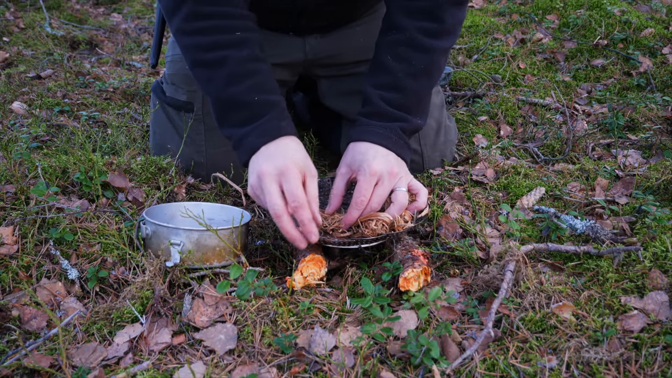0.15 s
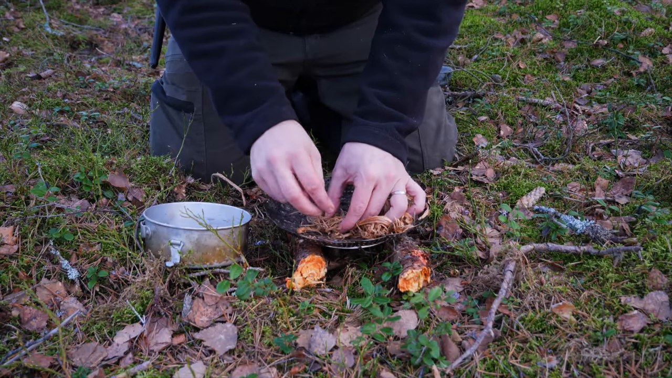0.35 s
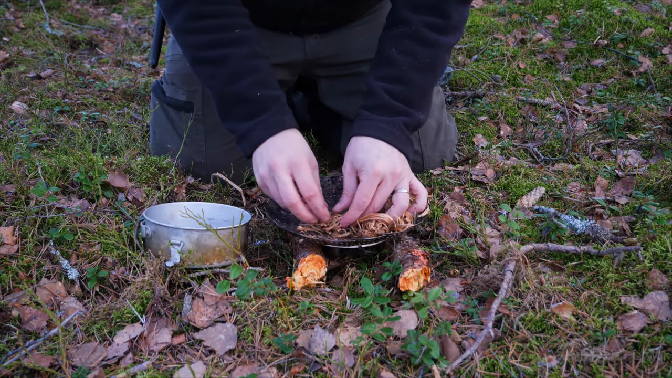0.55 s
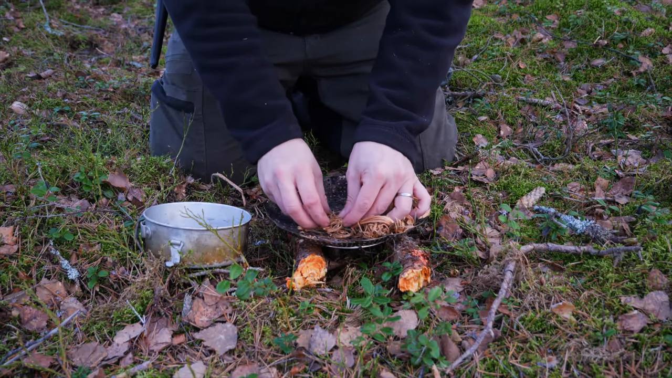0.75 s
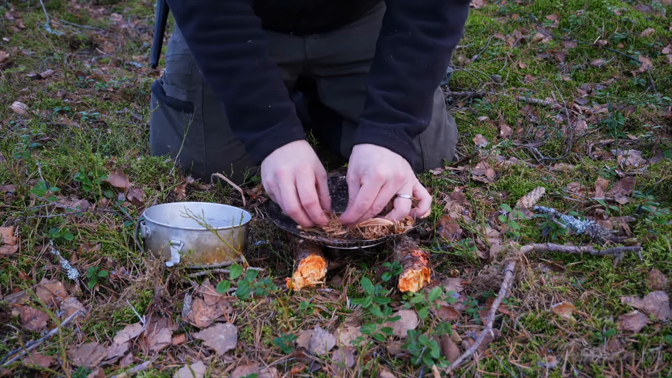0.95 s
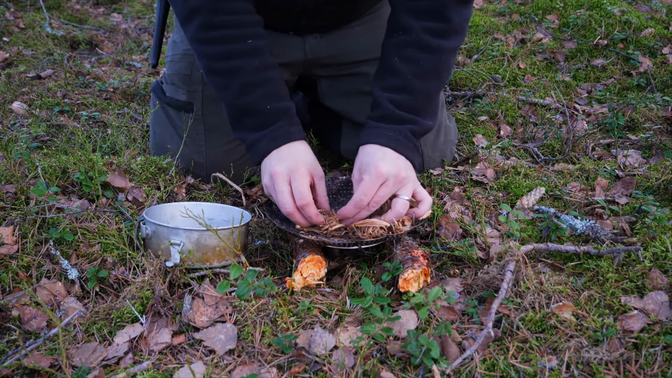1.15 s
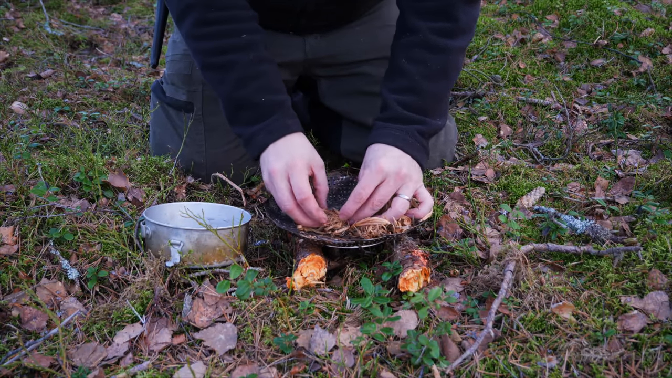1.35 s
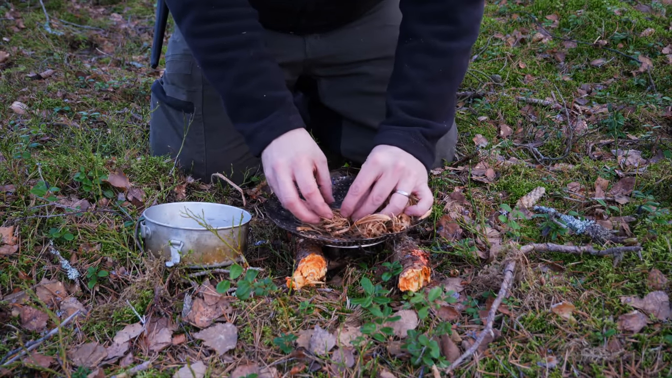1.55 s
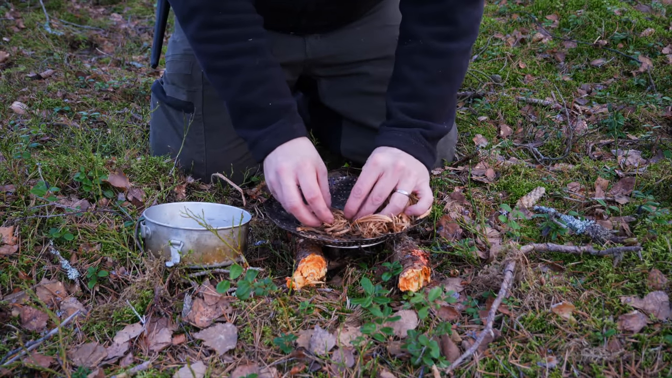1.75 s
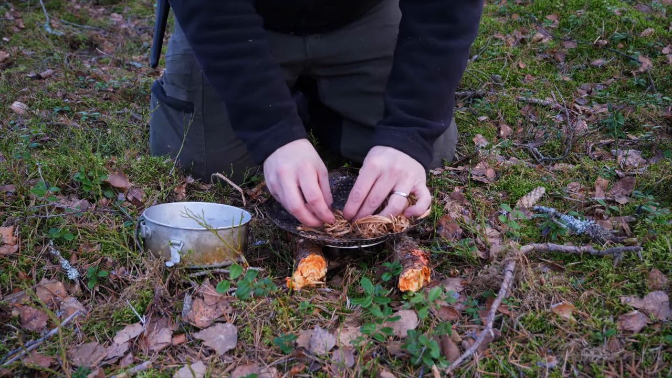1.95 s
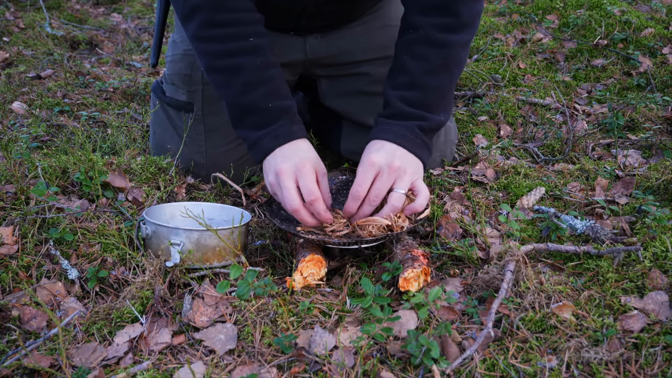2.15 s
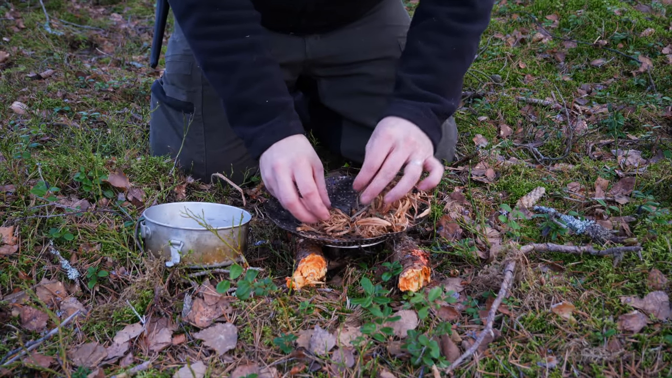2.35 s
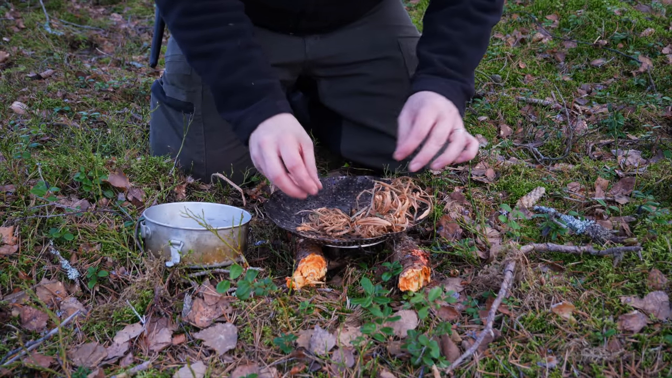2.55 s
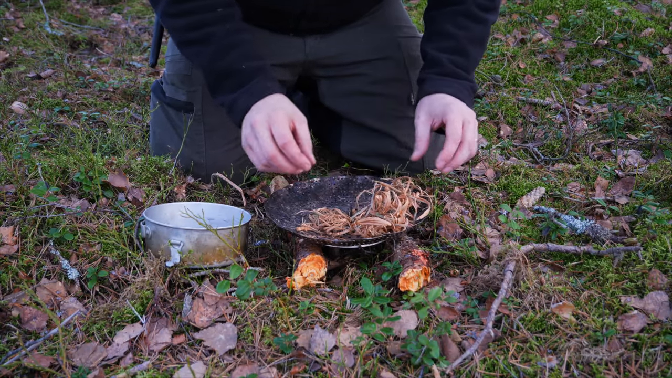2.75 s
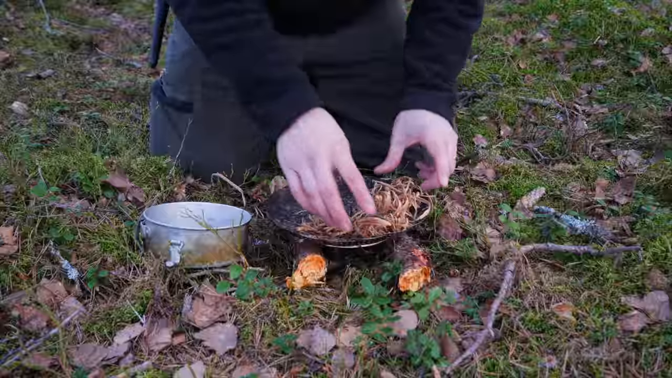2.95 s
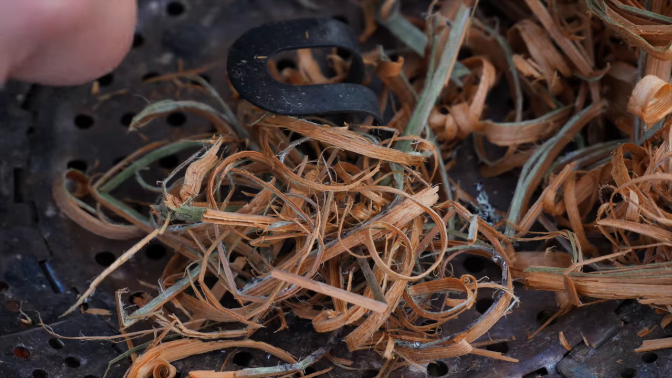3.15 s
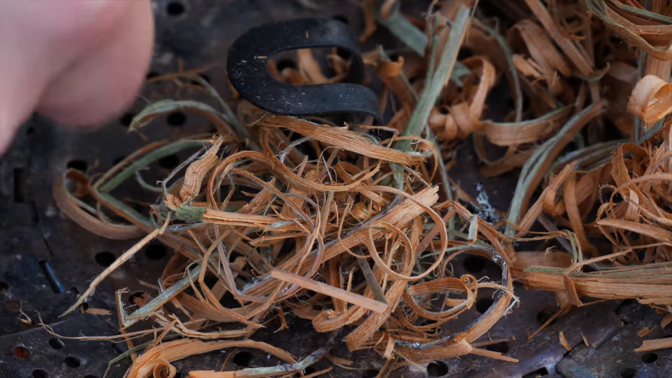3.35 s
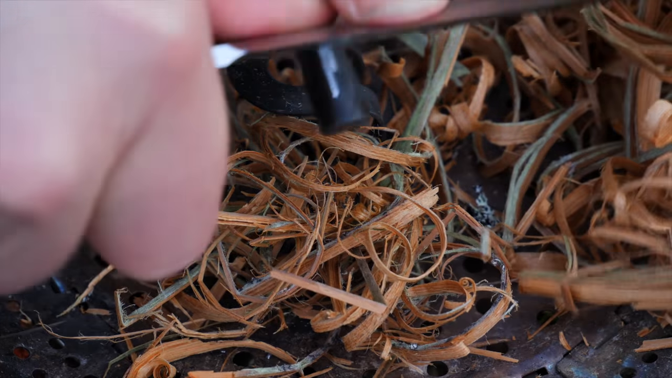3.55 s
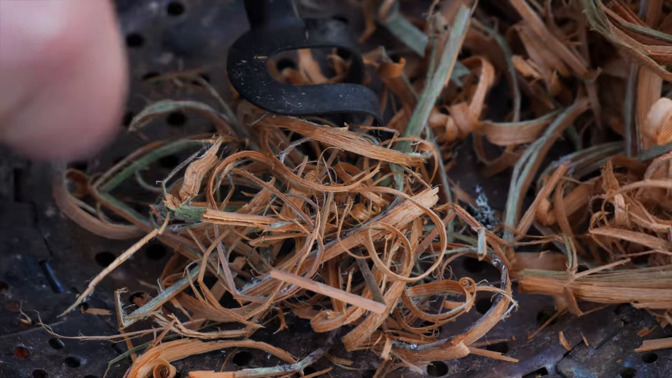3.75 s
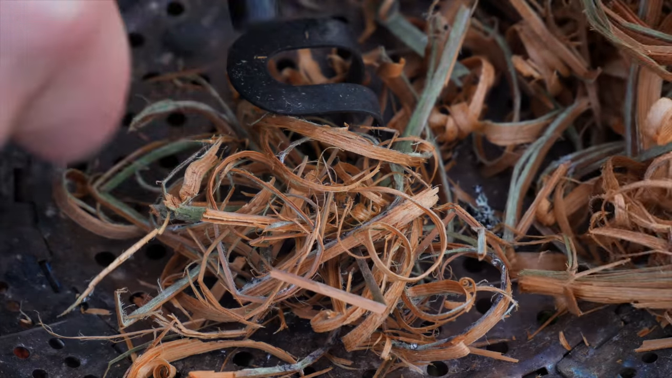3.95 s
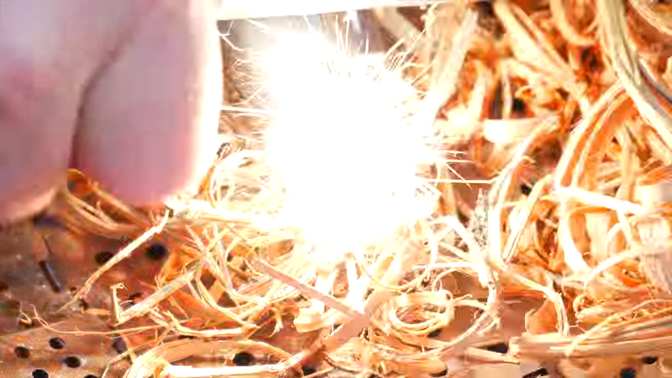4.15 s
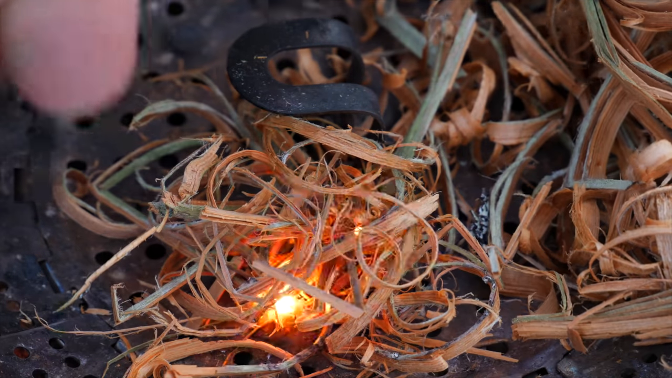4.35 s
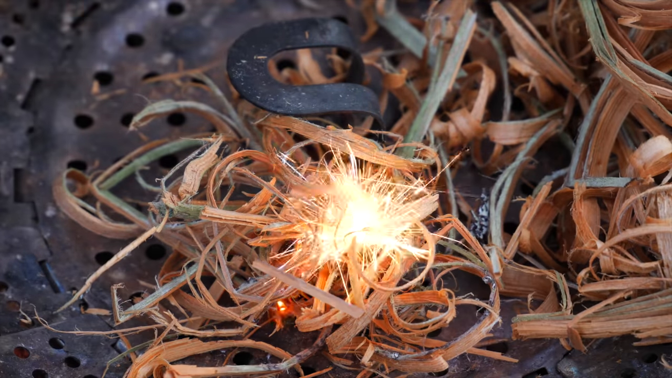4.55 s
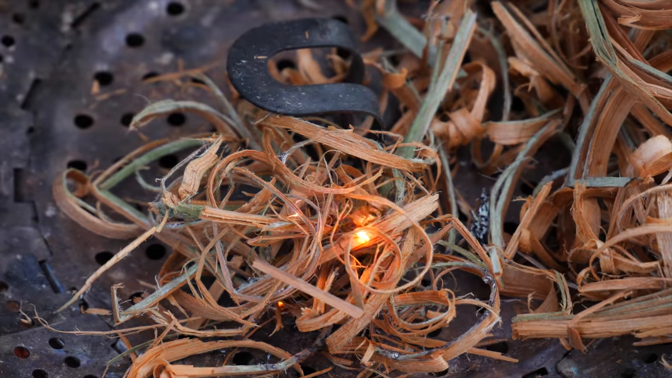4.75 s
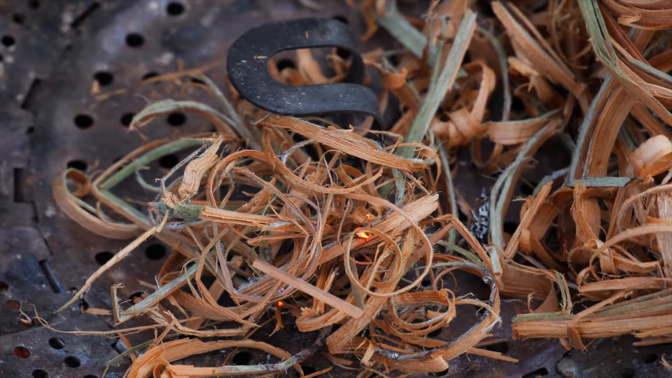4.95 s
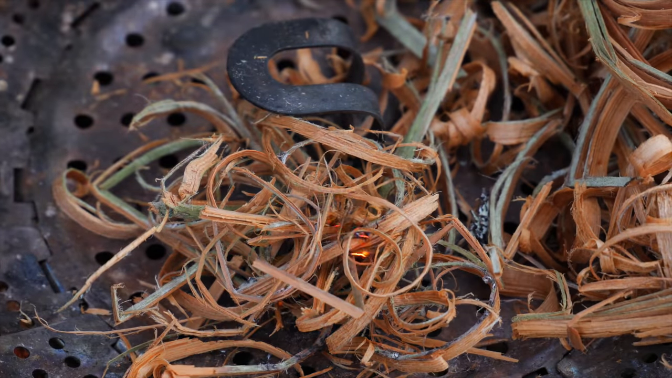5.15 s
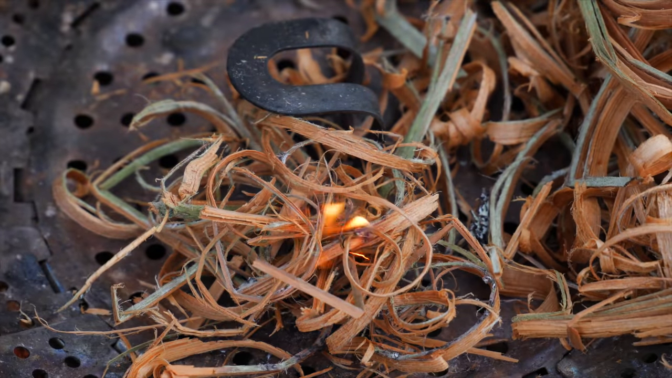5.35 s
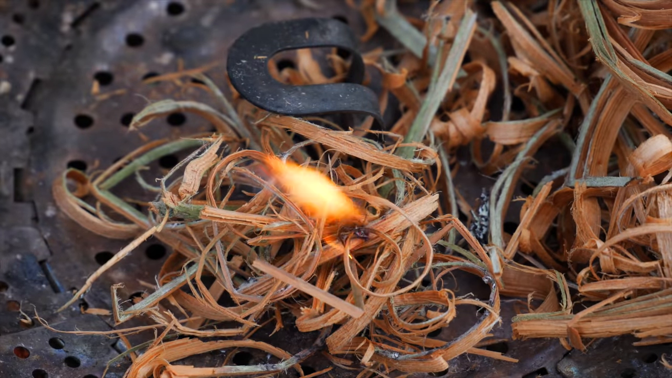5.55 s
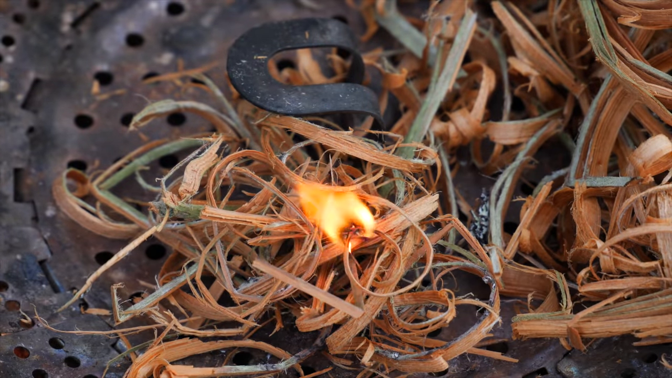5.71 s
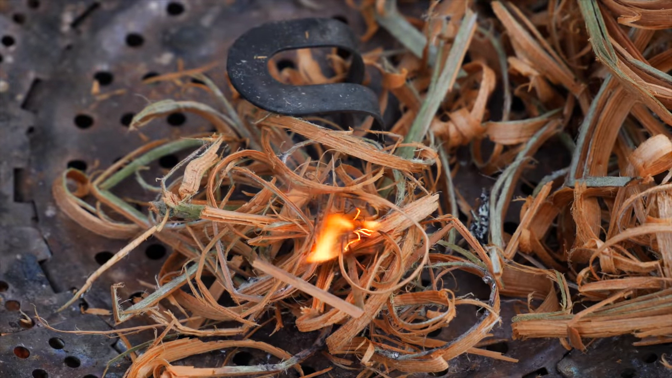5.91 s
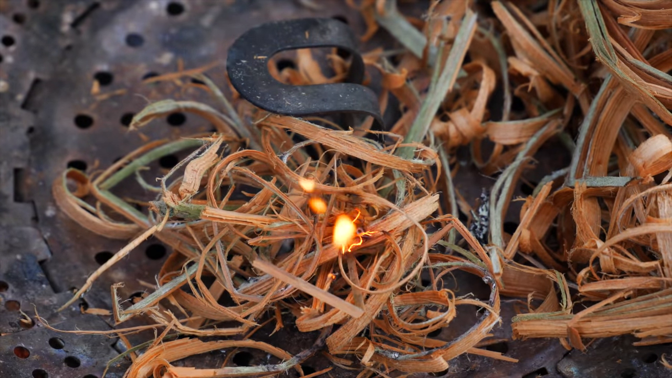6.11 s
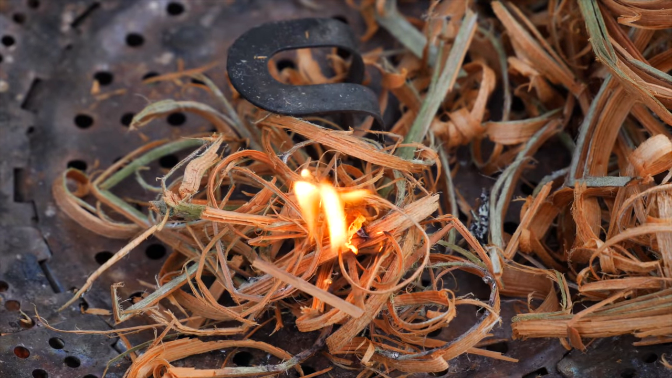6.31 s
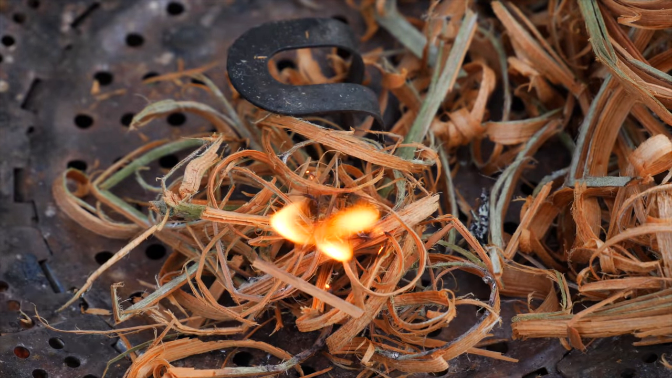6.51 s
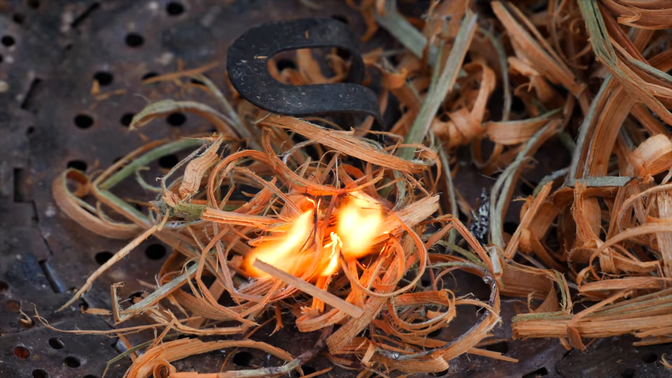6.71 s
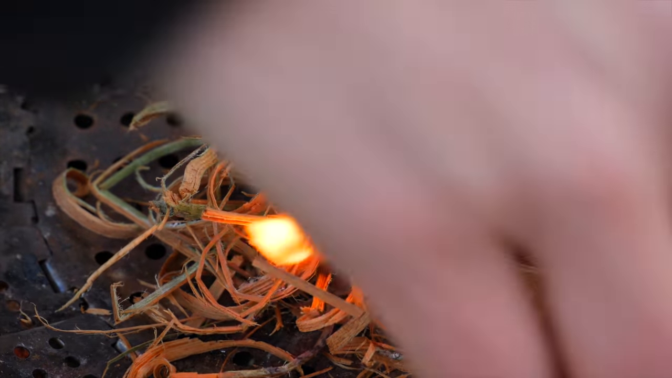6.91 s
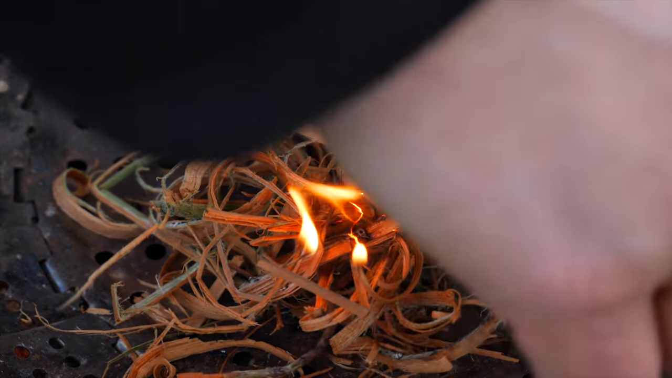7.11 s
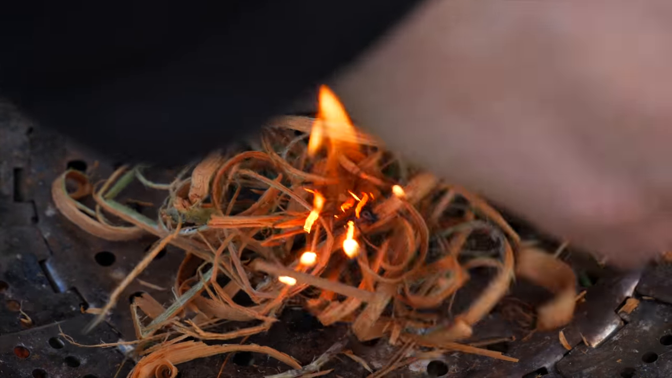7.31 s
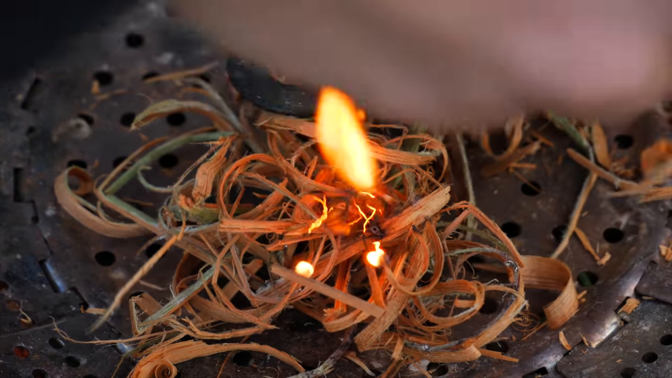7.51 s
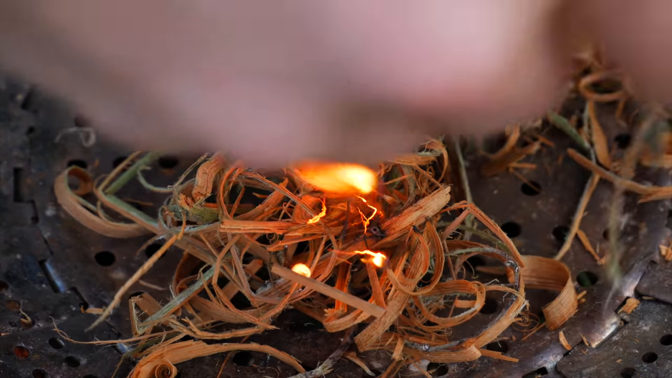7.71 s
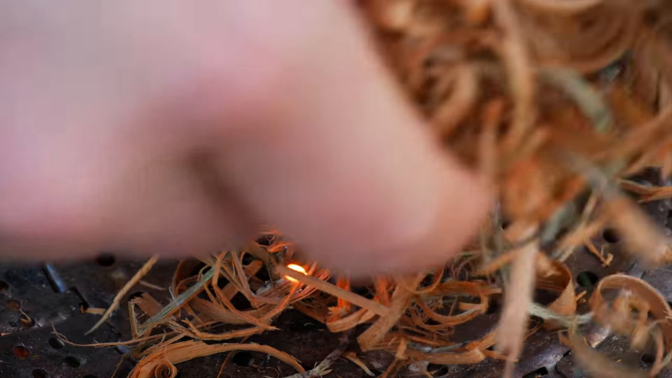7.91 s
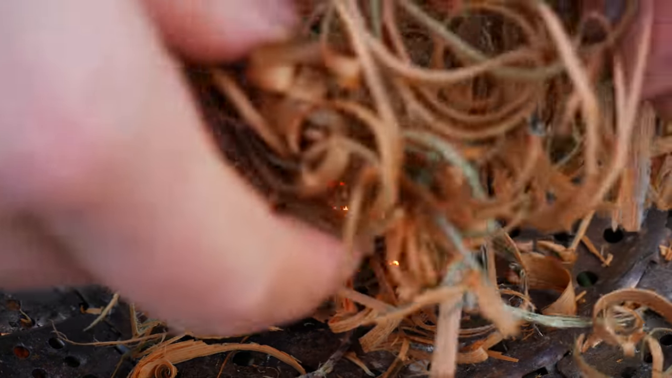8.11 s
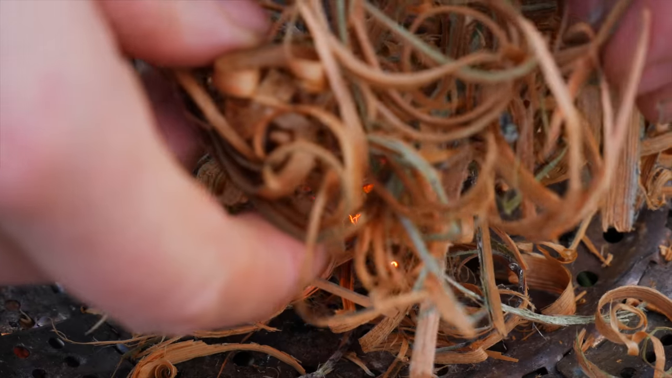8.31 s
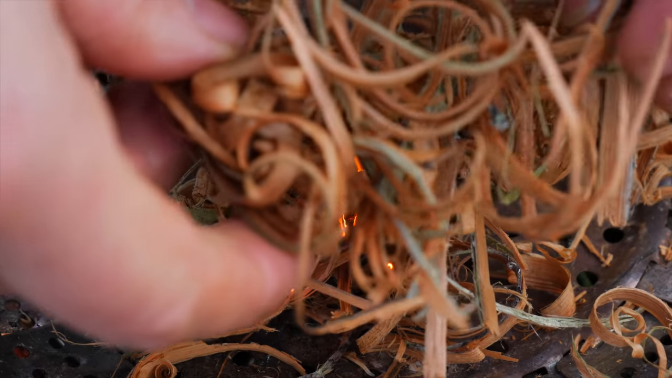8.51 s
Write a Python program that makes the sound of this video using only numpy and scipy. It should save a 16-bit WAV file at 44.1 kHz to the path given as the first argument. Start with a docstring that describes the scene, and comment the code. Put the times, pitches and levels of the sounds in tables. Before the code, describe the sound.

Soft handling of wood shavings, then chattering fire steel scrapes, a sizzling burst of sparks, light metal clinks and crackling tinder in a quiet forest.

```python
"""A scraper chatters along a fire steel in stick-slip runs, then bites in one long, spark-throwing stroke.
Before it, hands gather dry wood shavings on a small steel stove grate; the curls rub, skid and snap.
After it, sparks pop and sizzle in the tinder, the tools clink as they are laid down, and the shavings
crackle as they catch and are heaped over the flame. Close mono microphone, quiet forest, light breeze."""
import sys
import numpy as np
from scipy.fft import rfft, irfft, next_fast_len
from scipy.io import wavfile
from scipy.ndimage import map_coordinates

SR = 44100
rng = np.random.default_rng(int(sys.argv[2]) if len(sys.argv) > 2 else 0)


def inscribe(sig):
    """Save sig as 16-bit PCM at rate SR to the path in sys.argv[1].

    A 1-D sig is mono; a 2-D sig holds one channel per row.
    Samples are clipped to [-1, 1] before scaling.
    """
    pcm = np.round(np.clip(np.atleast_2d(sig).T, -1, 1) * 32767)
    wavfile.write(sys.argv[1], SR, pcm.astype(np.int16))


N = 377927


def amp(db):
    return 10 ** (np.asarray(db) / 20)


def unit(x):
    return x / np.sqrt(np.mean(x ** 2) + 1e-20)


def decay(t, t60_s):
    return np.exp(-np.log(1000) * t / t60_s)


def add(track, start_s, sound):
    part = track[round(start_s * SR):][:len(sound)]
    part += sound[:len(part)]


def colour(x, spectrum):
    """Minimum-phase filter through (frequency [Hz], gain [dB]) points."""
    size = next_fast_len(len(x) + 2048, real=True)
    hz, db = np.transpose(spectrum)
    gain = amp(np.interp(np.log(np.fft.rfftfreq(size, 1 / SR) + 1), np.log(hz + 1), db))
    cepstrum = irfft(np.log(np.maximum(gain, 1e-6)), size)
    cepstrum[1:size // 2] *= 2
    cepstrum[size // 2 + 1:] = 0
    return irfft(rfft(x, size) * np.exp(rfft(cepstrum)), size)[:len(x)]


def resonate(x, modes):
    """Parallel band-pass resonances of alternating sign."""
    size = next_fast_len(len(x) + 8192, real=True)
    f = np.fft.rfftfreq(size, 1 / SR)
    body = sum((-1) ** k * amp(db) * 1j * f * width_hz / (hz * hz - f * f + 1j * f * width_hz)
               for k, (hz, width_hz, db) in enumerate(modes))
    return irfft(rfft(x, size) * body, size)[:len(x)]


def noise(spectrum):
    return unit(colour(rng.standard_normal(N), spectrum))


def burst(envelope, spectrum):
    """Coloured noise under a short envelope, at the envelope's rms."""
    x = colour(rng.standard_normal(len(envelope)) * envelope, spectrum)
    return unit(x) * np.sqrt(np.mean(envelope ** 2))


def wobble(rate_hz):
    """Smooth random curve."""
    knots = rng.standard_normal(int(N * rate_hz / SR) + 4)
    return map_coordinates(knots, [np.arange(N) * rate_hz / SR])


def grains(per_s, spread_db, clump_db, clump_hz, friction):
    """Tiny uneven fractures in clumps, over smooth friction noise; rms 1."""
    sizes = amp(spread_db * np.minimum(rng.exponential(size=N), 4))
    ticks = (rng.random(N) < per_s / SR) * sizes * rng.choice([-1, 1], N)
    texture = unit(ticks) + friction * rng.standard_normal(N)
    clumps = amp(clump_db * 2.79 * np.tanh(wobble(clump_hz) / 2))
    return unit(texture * clumps)


def swells(rows):
    """Gain curve of short swells: (time [s], level [dB], length [s])."""
    out, t = np.zeros(N), np.arange(SR // 4) / SR
    for start_s, db, length_s in rows:
        u = 3.5 * t / length_s
        add(out, start_s, amp(db) * u ** 2 * np.exp(2 * (1 - u)))
    return out


def held(start_s, length_s, db, growth_db, attack_s, release_db_per_s):
    """Gain curve: attack, sloping hold centred on db, release."""
    t = np.arange(N) / SR - start_s
    hold_db = db + growth_db * (np.clip(t / length_s, 0, 1) - .5)
    fall_db = release_db_per_s * np.maximum(t - length_s, 0)
    return np.clip(t / attack_s, 0, 1) * amp(hold_db - fall_db)


# breeze strength: (time [s], level [dB])
BREEZE = [(0, -64.5), (3.03, -54.5), (3.17, -42.5), (3.65, -33.5), (4.1, -40), (4.35, -30), (4.9, -33.5),
          (5.15, -43), (5.8, -40.5), (6.8, -37), (7.25, -36.5), (7.9, -48.5), (8.57, -47.5)]
# background spectra: (frequency [Hz], gain [dB])
RUMBLE_SPECTRUM = [(11, -27), (18, 13), (43, -7.5), (76, -6), (108, -12.5), (220, -24.5), (290, -63.5),
                   (480, -120)]
FOREST_SPECTRUM = [(53, -29), (90, -7.5), (251, -10.5), (283, -13), (445, -14), (486, -13.5), (597, -14.5),
                   (2670, -30), (3000, -33.5), (3900, -55.5), (6600, -120)]
DRONE_SPECTRUM = [(35, -30.5), (75, 3.5), (100, 3.5), (135, -2), (200, -11), (500, -31.5), (2000, -67)]
HISS_SPECTRUM = [(900, -30.5), (1600, -16.5), (3400, -10.5), (8000, -12), (13500, -14), (15500, -18),
                 (16200, -34.5)]


def air(close_s=3.06, drone_fade_db_per_s=3.5):
    """A gusty breeze rumbles under forest murmur, a fading far drone and steady hiss."""
    t = np.arange(N) / SR
    gusts_db = np.interp(t, *np.transpose(BREEZE)) + 1.3 * wobble(4.5)
    rumble = amp(gusts_db - 7) * noise(RUMBLE_SPECTRUM)
    murmur_db = np.where(t < close_s, -65.5, -61)  # steps up once the microphone is close
    murmur = amp(murmur_db) * noise(FOREST_SPECTRUM)
    drone = amp(-58.5 - drone_fade_db_per_s * t) * noise(DRONE_SPECTRUM)
    return rumble + murmur + drone + amp(-72.5) * noise(HISS_SPECTRUM)


# hand effort on the tinder: (time [s], level [dB])
GATHERING = [(0, -71), (.56, -64), (1.05, -58), (1.55, -59.5), (1.99, -64), (2.45, -65), (2.7, -78.5)]
BRACING = [(3.1, -62), (3.5, -63), (3.93, -69), (4.2, -55), (4.5, -60), (4.7, -66)]
HEAPING = [(4.9, -78), (5.78, -72.5), (6.14, -50), (6.27, -46), (6.43, -45), (6.58, -49), (6.77, -43.5),
           (6.87, -59.5), (7.2, -51), (7.42, -57), (7.9, -59), (8.25, -65.5), (8.57, -66.5)]
# short crackles, shavings crushed or tinder faintly sizzling: (time [s], level [dB], length [s])
CRACKLES = [(1.82, -57.5, 0.1), (3.064, -48.5, 0.029), (5.1, -66.5, 0.15), (5.4, -69, 0.21),
            (5.9, -52, 0.084), (6.21, -33, 0.052), (6.435, -39, 0.043), (6.625, -38.5, 0.028),
            (6.67, -44, 0.061), (6.705, -36, 0.057), (6.735, -23, 0.038)]
# rubbed, pressed and crackling shavings: (frequency [Hz], gain [dB])
CURL_SPECTRUM = [(1760, -54), (3000, -13), (3170, -10.5), (5290, -6.5), (6130, -11), (6810, -5),
                 (7940, -0.5), (9660, -13), (10700, -12.5), (11800, -6.5), (14200, -12), (15100, -9.5),
                 (16000, -36)]
HEAP_SPECTRUM = [(120, -28.5), (300, -2), (480, 5.5), (900, 2), (1380, 4), (1700, 3), (2100, 2),
                 (2600, -1.5), (4500, -6), (6000, -14), (10000, -46.5)]
CRACKLE_SPECTRUM = [(150, -5.5), (700, -9), (2300, 2), (3500, -4), (5500, -2.5), (7500, 4.5), (9500, -13),
                    (13000, -12.5), (16000, -17)]


def shavings(tick_count=300, reference_db=-60):
    """Wood curls rub, tick and crackle; pressing brings out the body of the heap."""
    effort, pressing = np.zeros(N), np.zeros(N)
    phases = [(GATHERING, -65, .45), (BRACING, -57.5, .5), (HEAPING, -60.5, 1.26)]
    for curve, body_db, body_db_per_db in phases:
        effort_db = np.interp(np.arange(N) / SR, *np.transpose(curve), left=-200, right=-200)
        effort += amp(effort_db)
        pressing += amp(body_db + body_db_per_db * (effort_db - reference_db))
    rubbing = grains(per_s=1300, spread_db=4, clump_db=2, clump_hz=76, friction=1.18)
    crisp = effort * amp(-.83) * unit(colour(rubbing, CURL_SPECTRUM))
    body = pressing * amp(-4.5) * unit(colour(rubbing, HEAP_SPECTRUM))
    ticks, t = np.zeros(N), np.arange(SR // 100) / SR
    for when, pitch, size in rng.random((tick_count, 3)):
        hz = 2800 * 4.5 ** pitch
        tick = burst(decay(t, t60_s=.0045), [(hz / 4, -25), (hz, 0), (hz * 2, -12)])
        add(ticks, when * N / SR, amp(5 + 11 * size ** 2) * tick)
    fractures = grains(per_s=1300, spread_db=4, clump_db=2.5, clump_hz=170, friction=.55)
    crackle = swells(CRACKLES) * unit(colour(fractures, CRACKLE_SPECTRUM))
    return crisp + body + effort * ticks + crackle


# stiff curls dragged, and a short crunch of shavings at 3.064 s: (time [s], level [dB], length [s])
DRAGS = [(.125, -62, .012), (.45, -56, 0.084), (.53, -59.5, 0.038), (.80, -60, 0.017), (2.32, -64, .03),
         (2.42, -57.5, 0.021), (3.064, -44, 0.034), (7.064, -36, 0.025), (7.14, -45.5, 0.022),
         (7.205, -51, 0.095), (7.255, -45.5, 0.03)]
# grate resonances: (frequency [Hz], width [Hz], gain [dB])
GRATE_MODES = [(1140, 87, -12), (1740, 83, -4), (3000, 45, -5), (3170, 510, -0.5), (5030, 380, -3),
               (8150, 640, 4), (11400, 600, 3.5), (13800, 3300, -3.5)]


def grate():
    """Curls skid over the perforated steel and make it sing faintly."""
    skid = grains(per_s=4500, spread_db=.5, clump_db=1, clump_hz=140, friction=.71)
    return amp(3.5) * swells(DRAGS) * unit(resonate(skid, GRATE_MODES))


# dry fibres and twigs breaking: (time [s], level [dB], pitch [Hz])
SNAPS = [(1.039, -17.5, 8650), (1.1518, -24.5, 8200), (1.466, -39.5, 2800), (1.8415, -33, 8400),
         (2.3191, -39, 6900), (6.1484, -34, 3130), (6.19, -18.5, 2090), (6.216, -36, 7800),
         (6.4556, -13.5, 5940), (6.5655, -26.5, 8420), (6.6346, -19.5, 7550), (6.6874, -12, 7000),
         (6.7085, -14.5, 7150), (6.7405, -5.5, 7400), (6.7595, -17, 7480), (6.7644, -16, 8300),
         (6.7688, -7.5, 7620), (7.0668, -26, 8300), (7.482, -30, 9000), (7.6516, -34, 8070),
         (7.9814, -29, 7250), (8.0135, -31.5, 4260)]


def snaps():
    """A fibre cracks, then rings for an instant around its own pitch."""
    out, t = np.zeros(N), np.arange(SR // 15) / SR
    envelope = amp(-5.5) * decay(t, t60_s=.0014) + amp(-14.5) * decay(t, t60_s=.018)
    for start_s, db, hz in SNAPS:
        fibre = [(hz / 8, -25), (hz / 2, -8), (hz, 0), (hz * 1.45, -10), (hz * 4, -22)]
        add(out, start_s + .00097, amp(db) * burst(envelope, fibre))
    return out


# hand and tool bumps: (time [s], level [dB])
BUMPS = [(1.56, -52), (6.168, -38.5), (6.251, -44), (6.379, -35), (6.447, -35.5), (6.739, -27.5),
         (8.009, -62)]
# soft contact: (frequency [Hz], gain [dB])
BUMP_SPECTRUM = [(60, 13.5), (150, 7.5), (400, 2), (1200, -5), (2200, -24), (6000, -117)]


def bumps(attack_s=.002):
    """Soft contacts knock dully."""
    out, t = np.zeros(N), np.arange(SR // 2) / SR
    envelope = decay(t, t60_s=.14) * (1 - np.exp(-t / attack_s))
    for start_s, db in BUMPS:
        add(out, start_s, amp(db - 1) * burst(envelope, BUMP_SPECTRUM))
    return out


# hard contact or bursting spark: (frequency [Hz], gain [dB])
CLICK_SPECTRUM = [(120, 1.5), (700, -0.5), (2400, 1.5), (5000, -21), (8000, 3.5), (10500, -1.5),
                  (16000, -4)]


def struck_steel(touches, modes, attack_s=.00024):
    """Each touch clicks and rings the modes at new strengths, damped more or less by the hand."""
    out, t = np.zeros(N), np.arange(SR // 5) / SR
    for start_s, db, t60_factor in touches:
        ring = np.zeros(len(t))
        for hz, mode_db, t60_s in modes:
            envelope = amp(mode_db + rng.normal(0, 1.4)) * decay(t, t60_s * t60_factor)
            ring += envelope * np.sin(2 * np.pi * hz * rng.normal(1, .013) * t)
        ring *= 1 - np.exp(-t / attack_s)
        click = amp(-11.5) * burst(decay(t, t60_s=.0028), CLICK_SPECTRUM)
        add(out, start_s, amp(db - 2.5) * (ring + click))
    return out


# knocks on the pan: (time [s], level [dB], t60 factor [x])
PAN_KNOCKS = [(1.562, -52, 0.71), (1.825, -56, 0.55)]
# pan ring: (frequency [Hz], level [dB], t60 [s])
PAN_MODES = [(422, -8, 0.28), (547, -8, 0.34), (703, -2, 0.2), (1100, 4, 0.085), (1320, -14, 0.72)]


def stove_pan():
    """Knuckles ring the hollow stove pan."""
    return struck_steel(PAN_KNOCKS, PAN_MODES)


# scraper strokes: (time [s], length [s], rasp [dB], spray [dB], pressure change [dB])
STROKES = [(3.212, .05, -55.5, -67, -2), (3.45, 0.058, -47, -63, -3), (3.544, 0.037, -40.5, -47, 0),
           (3.803, 0.083, -38.5, -44, -2), (3.981, 0.017, -32, -37.5, 4), (4.008, 0.065, -34, -44, 16.5),
           (4.1, 0.11, -33, -34, 13), (4.222, 0.056, -24.5, -17, -1), (4.284, 0.034, -39, -31, 1.5),
           (4.359, 0.091, -41, -50.5, -5.5)]
# stick-slip runs: (start [s], end [s], slip rate [Hz], start level [dB], end level [dB])
SLIP_RUNS = [(3.392, 3.422, 70, -39, -27), (3.45, 3.5, 145, -24.5, -29.5), (3.537, 3.591, 72, -22.5, -18),
             (3.606, 3.623, 62, -15.5, -9.5), (3.636, 3.664, 37, -17, -20.5), (3.708, 3.719, 85, -12.5, -8),
             (3.725, 3.744, 135, -17, -21), (4.034, 4.044, 58, -24, -21), (4.057, 4.075, 100, -15.5, -11.5),
             (4.081, 4.114, 105, -23.5, -18), (4.123, 4.183, 85, -12, -21.5),
             (4.195, 4.209, 90, -16.5, -12)]
# scraper resonances against the rod: (frequency [Hz], width [Hz], gain [dB])
EDGE_MODES = [(830, 470, -8), (1200, 180, -1), (1750, 355, -1), (2120, 430, -1.5), (2414, 90, 3.5),
              (2870, 460, -6.5), (4450, 460, -12), (5040, 850, -15.5), (8280, 480, -10.5),
              (12500, 2700, -29.5)]
# tearing chips and flying sparks: (frequency [Hz], gain [dB])
RASP_SPECTRUM = [(120, -53.5), (280, -6), (700, 2.5), (1120, 4), (1450, 6.5), (1720, 10.5), (2420, 10.5),
                 (3000, 4), (3600, -6.5), (4400, -0.5), (6200, -6), (8500, -27.5), (10000, -22),
                 (16000, -40)]
SPRAY_SPECTRUM = [(1760, -41), (3000, -9), (3150, -11.5), (4570, -8), (5140, -12.5), (6710, -4.5),
                  (8230, 2), (8820, -1.5), (10400, -11.5), (12200, -4.5), (15100, -11), (16000, -29.5)]


def scraper(attack_s=.005, release_db_per_s=526.5, spray_db_per_db=2.27):
    """The edge tears chips off the rod in fast slips; a hard stroke throws a spray of sparks."""
    rasping, spraying = np.zeros(N), np.zeros(N)
    for start_s, length_s, rasp_db, spray_db, pressure_db in STROKES:
        rasping += held(start_s, length_s, rasp_db, pressure_db, attack_s, release_db_per_s)
        spraying += held(start_s, length_s, spray_db, spray_db_per_db * pressure_db,
                         attack_s, spray_db_per_db * release_db_per_s)
    tearing = grains(per_s=6000, spread_db=3.2, clump_db=4, clump_hz=200, friction=.7)
    rasp = rasping * amp(-2.5) * unit(colour(tearing, RASP_SPECTRUM))
    slipping = chatter(SLIP_RUNS, EDGE_MODES)
    shower = grains(per_s=6000, spread_db=3.2, clump_db=2.2, clump_hz=230, friction=.9)
    spray = spraying * amp(-4) * unit(colour(shower, SPRAY_SPECTRUM))
    return rasp + slipping + spray


def chatter(runs, modes, slip_s=.0078, scatter_db=.1):
    """The edge catches and slips at an even rate, in runs that grow or fade."""
    slips = []
    for start_s, end_s, rate_hz, start_db, end_db in runs:
        count = 1 + max(1, round((end_s - start_s) * rate_hz))
        for u in np.linspace(0, 1, count):
            db = start_db + u * (end_db - start_db) + rng.normal(0, scatter_db)
            slips.append((start_s + u * (end_s - start_s), db, slip_s))
    return swells(slips) * amp(-9) * unit(resonate(rng.standard_normal(N), modes))


# flare puff: (frequency [Hz], gain [dB])
PUFF_SPECTRUM = [(50, -18), (150, 2.5), (350, 1), (800, -7), (1500, -17.5), (4000, -50)]


def flare():
    """The spark shower flares up with a low puff."""
    envelope = held(start_s=4.225, length_s=.053, db=-36.5, growth_db=1,
                    attack_s=.012, release_db_per_s=601)
    return envelope * noise(PUFF_SPECTRUM)


# low thumps: (time [s], level [dB], frequency [Hz], t60 [s])
THUMPS = [(4.286, -42, 102, .12), (4.492, -33, 266, 0.017), (6.753, -32, 71.8, 0.59)]


def thumps(attack_s=.0045):
    """Damped low tones: one under the flare, one with a spark's pop, then one deep thud."""
    out, t = np.zeros(N), np.arange(SR // 2) / SR
    for start_s, db, hz, t60_s in THUMPS:
        envelope = decay(t, t60_s) * (1 - np.exp(-t / attack_s))
        add(out, start_s, amp(db) * envelope * np.sin(2 * np.pi * hz * t))
    return out


# bursting sparks: (time [s], level [dB])
POPS = [(4.356, -21.5), (4.491, -9.5), (4.528, -4.5), (4.533, -12), (4.541, -14), (4.562, -9.5),
        (4.628, -17.5), (4.656, -14), (4.665, -13.5), (4.888, -30)]
# fierce burn, then a last ember: (time [s], length [s], level [dB], growth [dB])
SIZZLES = [(4.526, 0.15, -30.5, -5), (4.698, 0.15, -49, 3)]
# burning flecks: (frequency [Hz], gain [dB])
SIZZLE_SPECTRUM = [(88, -25), (150, -0.5), (448, -16.5), (675, -2.5), (941, -10.5), (1390, -3.5),
                   (2220, -4), (3220, -11), (4320, -6), (5790, -14), (6390, -3), (8070, 3), (10000, -7),
                   (15100, -9.5), (16000, -6.5)]


def sparks():
    """Burning flecks of the rod sizzle and burst."""
    flecks = grains(per_s=2400, spread_db=3.6, clump_db=2.2, clump_hz=190, friction=.8)
    burning = sum(held(*row, attack_s=.0021, release_db_per_s=382) for row in SIZZLES)
    out = burning * unit(colour(flecks, SIZZLE_SPECTRUM))
    t = np.arange(SR // 30) / SR
    for start_s, db in POPS:
        add(out, start_s + .00058, amp(db - 5) * burst(decay(t, t60_s=.0053), CLICK_SPECTRUM))
    return out


# tool contacts: (time [s], level [dB], t60 factor [x])
ROD_TAPS = [(6.0921, -16.5, 0.78), (6.1044, -31, 0.68), (6.1794, -33.5, 1.1), (6.2018, -20, 0.62),
            (6.3714, -23, 1.84), (6.7421, -29.5, 2), (6.77, -26.5, 0.94)]
SCRAPER_KNOCKS = [(6.2525, -8, 0.7), (6.2885, -14, 0.7), (6.297, -34, .45), (6.303, -26, .5),
                  (6.309, -30, .5), (6.317, -22.5, 0.44), (6.3805, -22, 0.86), (6.456, -34, 0.34),
                  (6.743, -15.5, 1.3), (6.748, -21, 1.2), (6.77, -25, 1.2)]
# tool rings: (frequency [Hz], level [dB], t60 [s])
ROD_MODES = [(1070, -24, 0.14), (2090, -8, 0.1), (2235, 2.5, 0.058), (3030, -13, 0.046), (5080, -9.5, 0.06),
             (5700, -8, 0.023), (6360, -14, 0.033), (8600, -11, 0.018)]
SCRAPER_MODES = [(2110, -12.5, 0.073), (3040, -5.5, 0.035), (3420, -5, 0.025), (4370, 3, 0.0076),
                 (5600, -3.5, 0.014), (6500, -10, .014)]


def tool_clinks():
    """Rod and scraper ring as they are laid down."""
    return struck_steel(ROD_TAPS, ROD_MODES) + struck_steel(SCRAPER_KNOCKS, SCRAPER_MODES)


def scene():
    """One microphone feeds both channels."""
    fire_steel = scraper() + flare() + tool_clinks()
    stove = grate() + stove_pan()
    mono = air() + shavings() + stove + fire_steel + sparks() + snaps() + bumps() + thumps()
    return np.array([mono, mono])


def record(dry):
    """Band limit: low-pass with a raised-cosine edge."""
    cutoff_hz, edge_hz = 16150, 500
    size = next_fast_len(N + 8192)
    passed = np.clip((cutoff_hz - np.fft.rfftfreq(size, 1 / SR)) / edge_hz + .5, 0, 1)
    return irfft(rfft(dry, size) * np.sin(np.pi / 2 * passed) ** 2, size)[:, :N]


dry = scene()
out = record(dry)
inscribe(out)
```